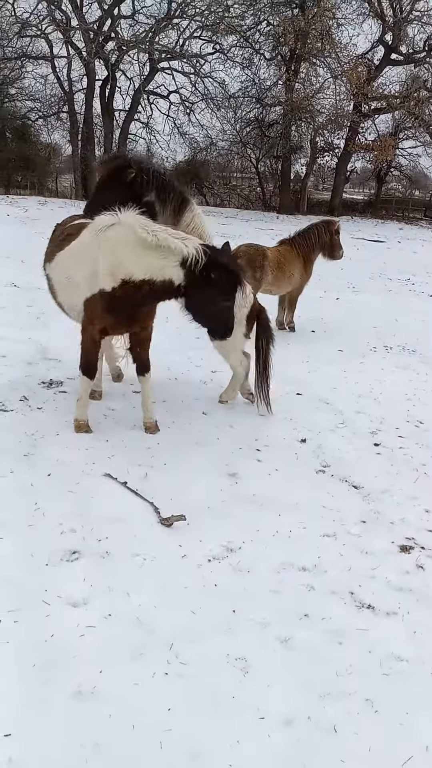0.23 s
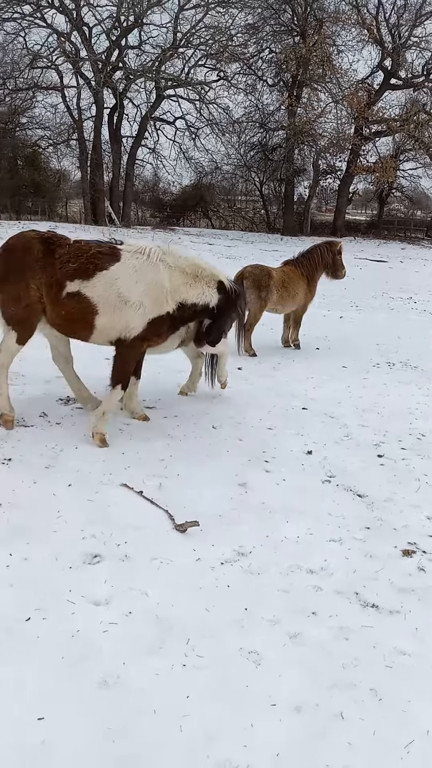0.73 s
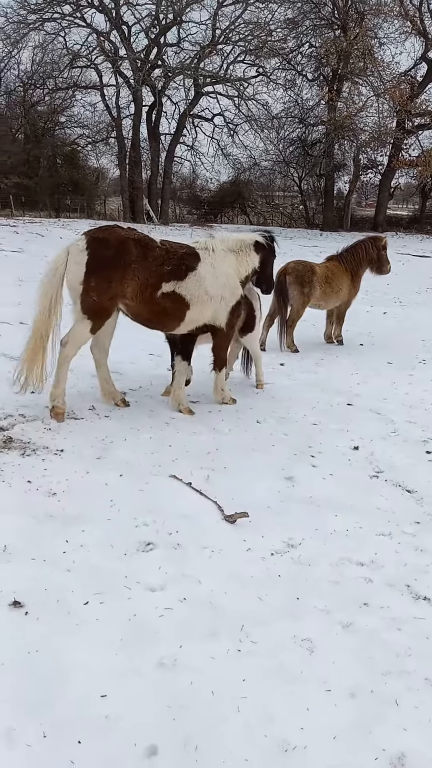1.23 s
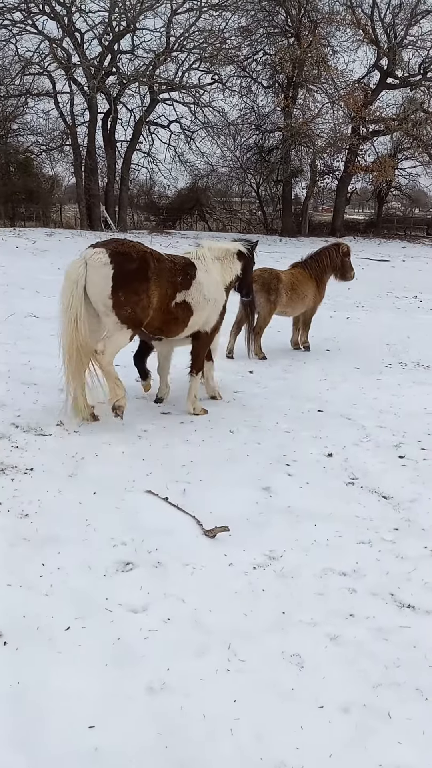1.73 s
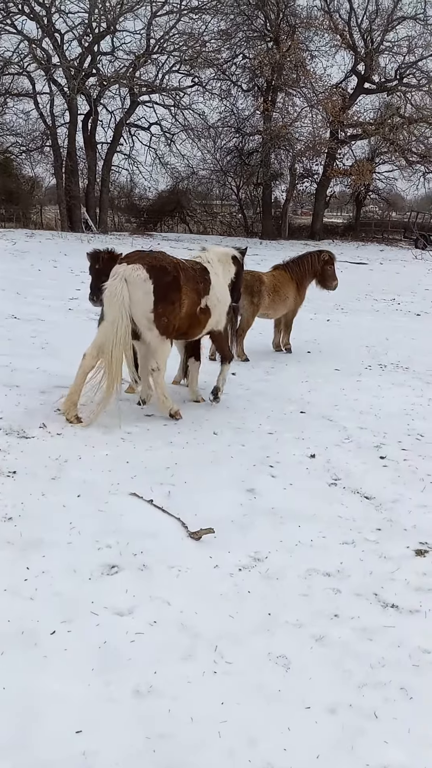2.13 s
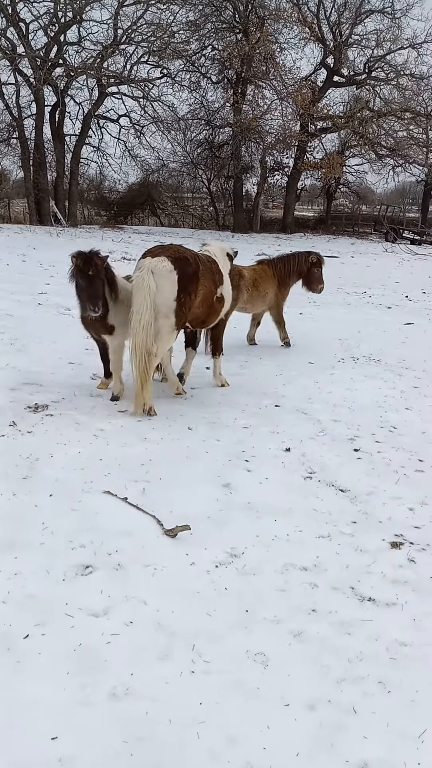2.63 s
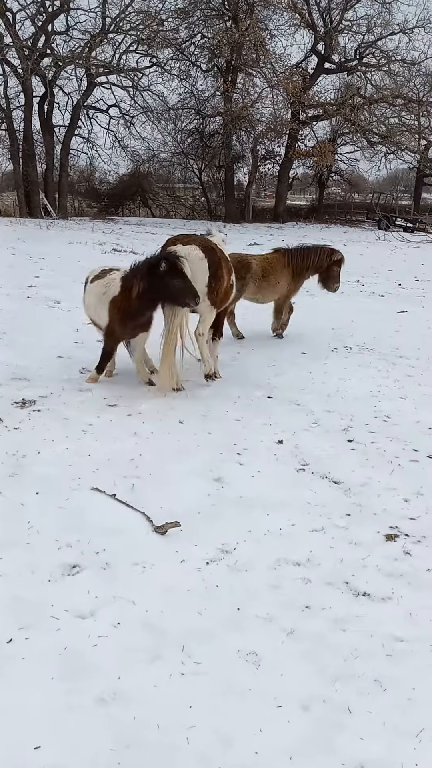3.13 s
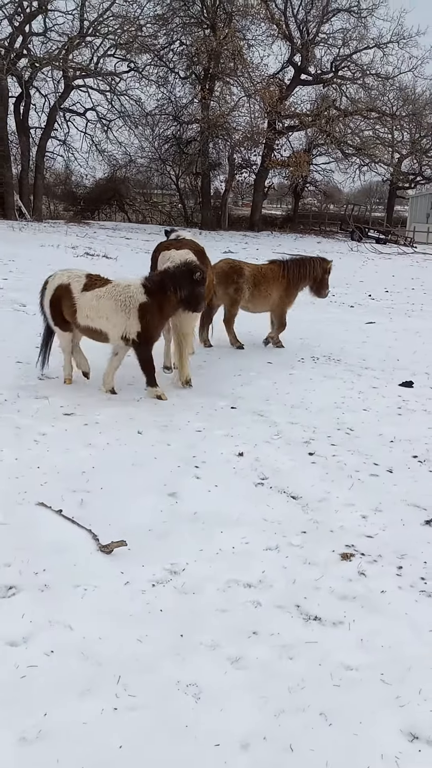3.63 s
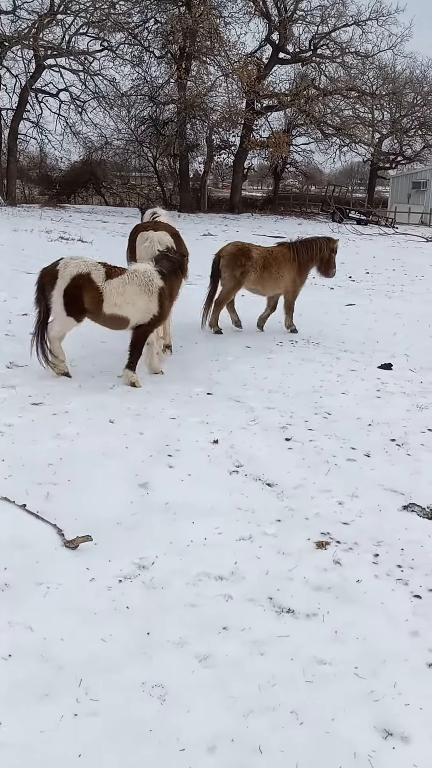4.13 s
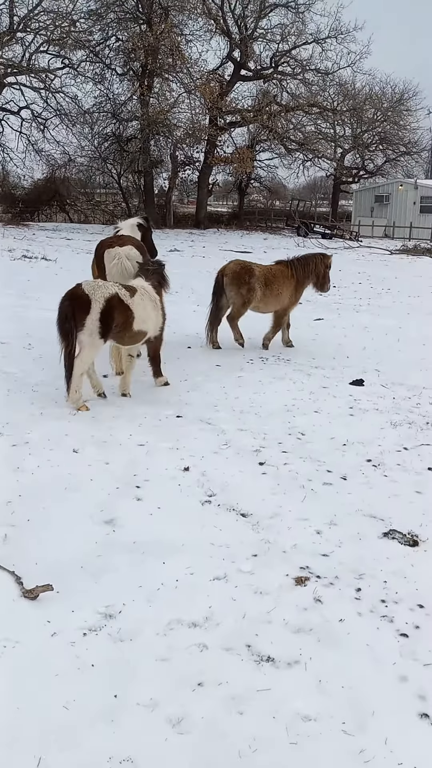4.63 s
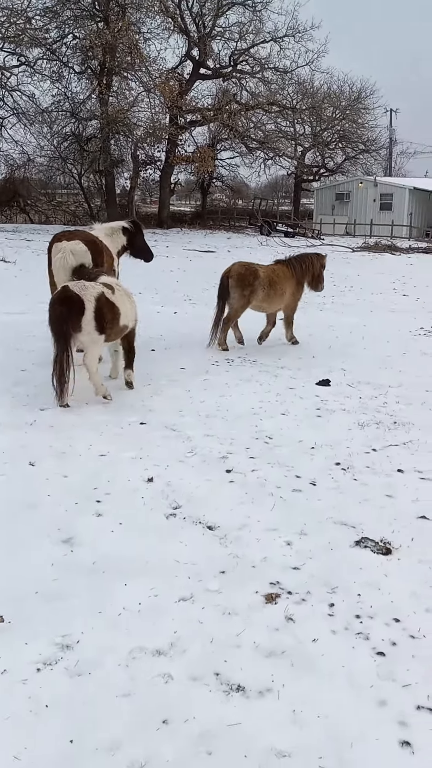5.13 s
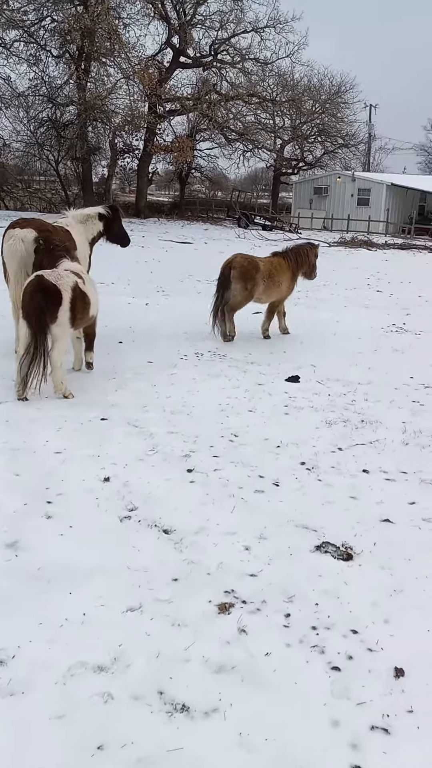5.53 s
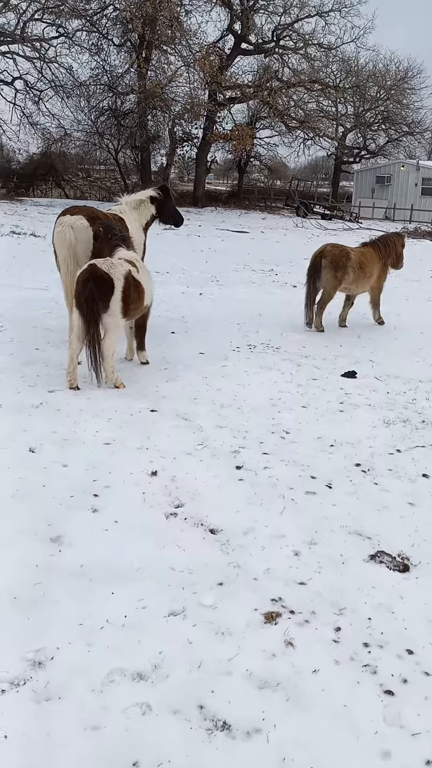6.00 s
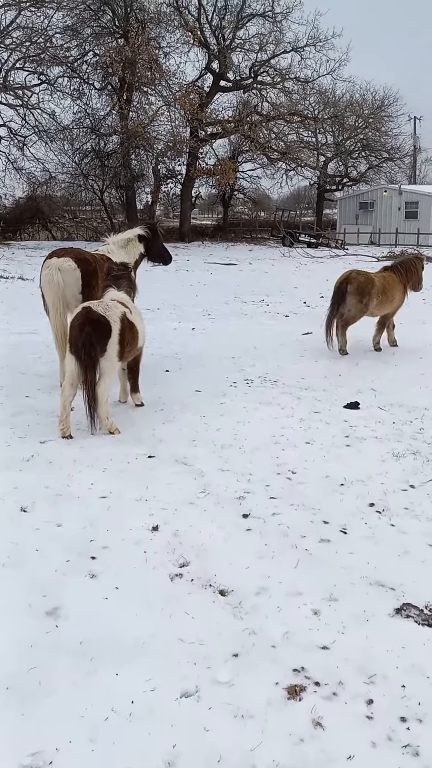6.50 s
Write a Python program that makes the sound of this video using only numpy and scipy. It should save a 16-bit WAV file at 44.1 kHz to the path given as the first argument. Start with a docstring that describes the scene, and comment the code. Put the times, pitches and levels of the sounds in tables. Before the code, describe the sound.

Hooves crunch through thin, crusted icy snow in quick irregular steps, with squeaky snaps, dull thuds and bright ice ticks over a low outdoor rumble.

```python
"""Pony hooves tread a thin crust of icy snow in an open field, a few metres from a hand-held stereo microphone.
Each step or scuff is a run of random clicks, tiny fractures, filtered into crunch, packed snow and grit.
Larger plates snap with a short squeak (a sine burst), hooves thud (low sagging tones) and ice crumbs tick
(ringing noise bursts). Loose crumbs crackle between steps and a low outdoor rumble, shaped noise, lies underneath.
Early on, one puff of wind, low resonant noise, brushes the right opening (port) of the microphone."""
import sys
import numpy as np
from scipy import signal
from scipy.fft import rfft, irfft, next_fast_len
from scipy.io import wavfile
from scipy.ndimage import uniform_filter1d

SR = 44100
rng = np.random.default_rng(int(sys.argv[2]) if len(sys.argv) > 2 else 0)


def dump(signal):
    """Clip the signal to [-1, 1] and save it as 16-bit WAV at the path in sys.argv[1]."""
    limited = np.clip(np.atleast_2d(signal).T, -1, 1)
    pcm = np.round(limited * 32767).astype(np.int16)
    wavfile.write(sys.argv[1], SR, pcm)


N = 298116
TIME = np.arange(N) / SR   # seconds


def from_db(db):
    """Turn decibels into gain."""
    return 10 ** (np.asarray(db) / 20)


def rms_one(x):
    """Scale to an rms (average strength) of 1."""
    return x / np.sqrt(np.mean(x ** 2) + 1e-20)


def even(x, span_s):
    """Hold the strength at 1 over every short span of time."""
    power = np.abs(uniform_filter1d(np.mean(x ** 2, axis=0), max(int(span_s * SR), 2)))
    return x / np.sqrt(power + 1e-9)


def drift(per_s):
    """Wander at random with rms 1, in straight lines between per_s new values a second."""
    return rms_one(np.interp(TIME * per_s, np.arange(N), rng.standard_normal(N)))


def in_time(curve, s):
    """Read the columns of a curve at time s."""
    times, *columns = np.transpose(curve)
    return [np.interp(s, times, column) for column in columns]


def at_hz(points, hz):
    """Read a spectrum on a log-frequency axis."""
    f, value = np.transpose(points)
    return np.interp(np.log(hz), np.log(f), value)


def colour(x, spectrum, size=4096):
    """Filter without pre-echo to the shape of a spectrum; white noise keeps its rms."""
    hz = np.maximum(np.arange(size // 2 + 1) * SR / size, 1)
    # folding the cepstrum makes the filter respond as early as it can (minimum phase)
    cepstrum = irfft(np.log(from_db(at_hz(spectrum, hz))))
    cepstrum[1:size // 2] *= 2
    cepstrum[size // 2 + 1:] = 0
    response = irfft(np.exp(rfft(cepstrum)))
    return signal.oaconvolve(x, response[None] / np.linalg.norm(response), axes=1)[:, :N]


def resonate(x, hz, width_hz):
    """Ring at one resonance; white noise keeps its rms."""
    r = np.exp(-np.pi * width_hz / SR)
    gain = np.sqrt((1 - r * r) / 2)
    return signal.lfilter(gain * np.array([1, 0, -1]), [1, -2 * r * np.cos(2 * np.pi * hz / SR), r * r], x)


def both_ports(x, lead_s):
    """Let a sound reach the left port lead_s before the right one."""
    return np.array([x, np.interp(TIME - lead_s, TIME, x)])


def swell(s, length_s, tail=1):
    """Give sample indices, time from the peak and envelope of a burst that builds up and dies."""
    first = max(int((s - 4 * length_s) * SR), 0)
    last = min(int((s + 5 * length_s * tail) * SR), N)
    at = np.arange(first, last)
    t = TIME[at] - s
    return at, t, 1 / np.cosh(2 * t / (length_s * np.where(t > 0, tail, 1)))


LEAD_SPREAD_S = .000017   # largest time lead of a spot under the hoof


def fractures(per_s, spread_db, clump_db, even_s, count=5):
    """Break ice bonds at random, mostly small and in clumps of loudness, at several spots: stereo clicks."""
    out, together = 0, drift(170)
    for offset in np.linspace(-1, 1, count):
        born = rng.random(N) < per_s / count / SR
        size_db = spread_db * np.minimum(rng.exponential(1, N), 4) + clump_db * together
        sizes = from_db(size_db) * rng.choice([-1, 1], N)
        out = out + both_ports(born * sizes, round(offset * LEAD_SPREAD_S * SR) / SR)
    return even(out, even_s)


def flake(clicks, ring, decay_s, size=512):
    """Make each click ring briefly with a random pattern of resonances, drawn afresh for each run."""
    response = rng.standard_normal(size) * np.exp(-TIME[:size] / decay_s)
    response *= ring / np.linalg.norm(response)
    response[0] = 1
    rung = signal.fftconvolve(clicks, response[None] / np.linalg.norm(response), axes=1)
    return rung[:, :clicks.shape[1]]


# A hoof sinks in (fading) or rolls off (swelling).
# Each row: start in seconds, length in seconds, base level in dB, change over the run in dB.
STEPS = [(0.0, 0.028, -34, 1), (0.105, 0.088, -31, 4), (0.173, 0.15, -23.5, -3), (0.346, .1, -30.5, -13),
         (0.536, 0.16, -23.5, -5.5), (0.692, 0.13, -36, 13), (1.09, 0.16, -33, -10.5),
         (1.335, 0.03, -38.5, -5), (1.38, 0.058, -36, -7), (1.543, 0.08, -44, 20), (2.042, .13, -25, 1),
         (2.19, 0.09, -35, -7), (2.383, 0.13, -31, -15.5), (2.492, 0.15, -42, -0.5),
         (2.682, 0.054, -34, 24), (2.777, 0.032, -29, -6), (2.861, 0.076, -30, -4), (3.032, .15, -29, 2),
         (3.194, 0.16, -25, -5.5), (3.373, .18, -31, 4), (3.568, .18, -35.5, -6.5), (3.755, 0.091, -29, -9),
         (3.841, 0.057, -30.5, 31), (3.898, .14, -34, 11), (4.042, 0.14, -32.5, 17),
         (4.195, 0.12, -33, -2.5), (4.335, 0.14, -31.5, -8), (4.519, 0.048, -32, 11), (4.6, 0.15, -28, -7),
         (4.741, 0.21, -30.5, -20.5), (4.975, 0.055, -24.5, -11), (5.078, 0.032, -23.5, -14),
         (5.105, 0.077, -43.5, 0), (5.237, 0.075, -34.5, 2), (5.306, .16, -39, -1), (5.484, .24, -33.5, -8),
         (5.741, 0.082, -30.5, 6), (5.86, 0.075, -53, 12), (5.939, 0.094, -27.5, -4.5),
         (6.055, .17, -42, 5), (6.247, 0.068, -32, -12), (6.311, 0.17, -41.5, 2), (6.472, 0.15, -34.5, 2),
         (6.691, 0.059, -36, 18)]
# A hoof only scuffs the crust. Each row: start in seconds, base level in dB.
SCUFFS = [(0.059, -29), (0.822, -30), (1.207, -37), (1.295, -40.5), (1.449, -31), (1.507, -35),
          (1.636, -35.5), (1.693, -47), (1.753, -35), (1.845, -34), (1.978, -31), (2.736, -30.5),
          (2.899, -31.5), (3.004, -34), (3.09, -32.5), (3.626, -27), (4.926, -40), (5.041, -30),
          (5.194, -41), (6.639, -35)]
# The patch of snow being trodden.
# Each row: time in seconds, base crust pitch in Hz, extra grit in dB, extra weight in dB.
PATCH = [(0, 2020, 2.5, -0.5), (.7, 1990, -0.5, -3.5), (1.2, 1770, -4.5, -1.5), (1.8, 1920, 0, 2),
         (2.2, 2060, -2, -2.5), (3.1, 1680, 0.5, 0.5), (3.5, 1620, -5, -1.5), (3.8, 1830, -1, 2.5),
         (4.3, 1840, 1, 1.5), (5.2, 1740, 1.5, 0.5), (5.9, 1550, -3, -0.5), (6.76, 1570, -1.5, 4)]
SCUFF_S, SCUFF_FADE_DB = 0.053, -34.5   # every scuff dies away alike
# a harder crush shakes more packed snow (weight) and throws more grit: base levels for a typical crush
TYPICAL_DB = -30
STEP_WEIGHT_DB, STEP_GRIT_DB, SCUFF_WEIGHT_DB, SCUFF_GRIT_DB = -28.5, -36.5, -24, -35.5
WEIGHT_FOLLOWS, GRIT_FOLLOWS = 0.8, 0.54   # dB per dB of crush


def runs():
    """List each step and scuff with weight and grit set by its strength and the snow underfoot."""
    steps = [(*row, STEP_WEIGHT_DB, STEP_GRIT_DB) for row in STEPS]
    scuffs = [(s, SCUFF_S, level_db, SCUFF_FADE_DB, SCUFF_WEIGHT_DB, SCUFF_GRIT_DB) for s, level_db in SCUFFS]
    for s, length, level_db, change_db, weight_db, grit_db in steps + scuffs:
        hz, gritty_db, heavy_db = in_time(PATCH, s)
        force_db = level_db - TYPICAL_DB
        weight_db = weight_db + heavy_db + WEIGHT_FOLLOWS * force_db
        grit_db = grit_db + gritty_db + GRIT_FOLLOWS * force_db
        yield s, length, level_db, change_db, hz, weight_db, grit_db


# How the sound of crust, packed snow and grit spreads over pitch.
# Each row of all three: frequency in Hz, relative strength in dB per Hz.
CRUST = [(150, -16), (330, 0.5), (480, -2.5), (660, 3), (1000, -4), (1400, -1), (2100, -1), (2450, -3),
         (2750, -5), (3300, -15), (4500, -29), (9000, -71)]
WEIGHT = [(25, -48), (50, -27.5), (75, -0.5), (115, 4.5), (180, -3), (280, -5), (400, -14.5), (900, -42.5)]
GRIT = [(1500, -63), (2650, 3), (3200, 3), (4200, 4), (5400, -3.5), (6500, -0.5), (7000, 4), (7750, 8),
        (8600, -4), (9500, -11.5), (10300, -5.5), (12500, -0.6), (15000, 1), (16000, -21)]


def crunches(settle_s=0.0054):
    """Let runs of fractures ring the crust, shake the packed snow below and throw off grit."""
    coarse = colour(fractures(per_s=1500, spread_db=3.5, clump_db=3.0, even_s=0.037), CRUST)
    fine = colour(fractures(per_s=4000, spread_db=4.0, clump_db=5.0, even_s=0.023), GRIT)
    # plates of three sizes ring, each coming and going on its own
    turns = [rms_one(from_db(7.15 * drift(70))) for _ in range(3)]
    out, weight = np.zeros((2, N)), np.zeros(N)
    for s, length, level_db, change_db, hz, weight_db, grit_db in runs():
        at = np.arange(max(int((s - .004) * SR), 0), min(int((s + length + .06) * SR), N))
        t = TIME[at] - s
        fade_in = np.clip(.5 + t / 0.0067, 0, 1)
        settling = np.exp(-np.maximum(t - length, 0) / settle_s)   # the crumbs settle after the run
        gate = fade_in * settling
        shape = rms_one(from_db(change_db * np.clip(t / length, 0, 1)) * gate)
        share = np.sqrt(length * SR / len(at))   # refers the level to the run, not to its tail
        crust = flake(coarse[:, at] * shape, ring=0.6, decay_s=0.0013)
        plates = sum(resonate(crust * turn[at], hz * step, width_hz=600)
                     for step, turn in zip((.84, 1.02, 1.14), turns))
        crust = rms_one(crust + from_db(-11.5) * plates)
        grit = rms_one(flake(fine[:, at] * shape, ring=0.8, decay_s=0.0009))
        out[:, at] += share * (from_db(level_db + 1.32) * crust + from_db(grit_db - 1.1) * grit)
        weight[at] += from_db(weight_db) * np.sqrt(share * shape * gate)
    packing = colour(fractures(per_s=1500, spread_db=3, clump_db=3.5, even_s=0.019), WEIGHT)
    return out + from_db(-3.5) * even(packing, 0.0296) * weight


def strays():
    """Keep loose crumbs crackling between the steps, louder as the snow gets trampled."""
    dull = colour(fractures(per_s=500, spread_db=3.5, clump_db=1, even_s=0.2), CRUST)
    bright = colour(fractures(per_s=500, spread_db=0.0, clump_db=5.0, even_s=0.56), GRIT)
    trampled = from_db(np.interp(TIME, [2.3, 3.5], [-4, 0]))
    return trampled * (from_db(-45.5) * dull + from_db(-47.5) * bright)


# How the rumble spreads over pitch. Each row: frequency in Hz, relative strength in dB per Hz.
RUMBLE = [(20, -41), (42, -31), (65, 0), (90, 6.4), (125, -1.5), (180, -15.5), (300, -16), (500, -31.5),
          (900, -49), (1700, -21.5), (3000, -32.5), (15000, -48)]
# How loud the rumble is. Each row: time in seconds, level in dB.
RUMBLE_LEVEL = [(.7, -32.5), (.92, -39), (1.8, -33), (2.3, -36.5), (2.6, -32), (3.9, -33), (4.45, -38),
                (4.8, -36), (6, -33.5)]


def outdoors(apart=0.29):
    """Shape noise into a low rumble with a faint hiss, partly different at each port."""
    air = rng.standard_normal(N) + apart * rng.standard_normal((2, N))
    level = from_db(in_time(RUMBLE_LEVEL, TIME)[0])
    return level * even(colour(air, RUMBLE), 0.1)


# Plates of crust breaking. Each row: peak time in seconds, base level in dB, middle pitch in Hz.
SNAPS = [(0.0284, -9, 1960), (.0651, -4, 1960), (0.1721, -5.5, 2060), (0.203, -10, 2180),
         (0.3197, -20, 1960), (0.5534, -23, 1710), (0.5929, -11, 1820), (.613, -14, 1700),
         (.673, -8.5, 675), (.8022, -8, 2070), (0.8315, -6, 1730), (1.1008, -10, 1310), (1.1557, -18, 2100),
         (1.3835, -12, 1980), (1.41, -17.5, 580), (1.4505, -11.5, 2030), (1.696, -18.5, 1780),
         (1.8679, -11.5, 850), (2.088, -4.5, 1910), (2.119, -22, 1970), (2.2594, -12.5, 2180),
         (2.3817, -14, 1900), (2.467, -15, 1630), (2.5921, -13.5, 1720), (2.7956, -12, 1760),
         (2.9002, -13, 1040), (2.9482, -11.5, 584), (3.0685, -13, 1480), (3.0919, -9, 1580),
         (3.129, -12, 1780), (3.1984, -7, 1860), (3.2226, -14, 1690), (3.4448, -14.5, 1660),
         (3.585, -6, 1870), (3.6018, -11, 1780), (3.67, -8.5, 1680), (3.7638, -17, 880),
         (3.8063, -12.5, 1860), (3.895, -14.5, 1830), (4.24, -11.5, 1590), (4.2507, -9, 1880),
         (4.2969, -14, 1500), (4.3473, -16, 1900), (4.5127, -3.5, 1370), (4.5894, -11, 1650),
         (4.6806, -8.5, 2190), (4.746, -9.5, 1660), (4.8939, -19.5, 750), (4.9952, -12, 1840),
         (5.0122, -7, 1840), (5.0502, -13, 1290), (5.0818, -16, 1900), (5.0982, -17, 1880),
         (5.208, -24.5, 516), (5.249, -19, 1920), (5.5972, -13.5, 1560), (5.6596, -9.5, 1700),
         (5.7744, -12, 1160), (5.8402, -9, 1620), (6.028, -5.5, 1640), (6.1468, -15, 1830),
         (6.2492, -8, 1680), (6.3006, -8.5, 1760), (6.5784, -12.5, 1500), (6.6406, -13, 1540),
         (6.7514, -9, 1600)]
# Where the snaps lie on average. Each row: time in seconds, left minus right level in dB.
SNAP_SIDE = [(0, -6.5), (.5, -8), (.7, -1.5), (3, -3), (6.76, -1.5)]
SNAP_S, SNAP_SCATTER = .00125, .22   # typical length in seconds, and its spread from plate to plate (log units)
SNAP_GRIT_DB, SNAP_GRIT_FOLLOWS = -20, 0.42   # base grit of a 0 dB snap, and dB per dB of snap
SNAP_LEAD_S = .00009   # average time lead of the left port
SNAP_SPREAD_DB, SNAP_LEAD_SPREAD_S = 3, .00009   # each plate lies in a slightly different direction


def snaps(rough=0.4, wander=0.092):
    """Break each plate with a quick stick-slip squeak, a broad crack and a puff of grit."""
    squeak, crack, grit = np.zeros((3, 2, N))
    breaking = even(colour(rng.standard_normal((1, N)), CRUST), 0.0018)[0]
    jitter = rng.standard_normal(N)
    for s, level_db, hz in SNAPS:
        at, t, envelope = swell(s, SNAP_S * np.exp(SNAP_SCATTER * rng.standard_normal()))
        pan_db = in_time(SNAP_SIDE, s)[0] + SNAP_SPREAD_DB * rng.standard_normal()
        lead_s = SNAP_LEAD_S + SNAP_LEAD_SPREAD_S * rng.standard_normal()
        phase = 2 * np.pi * (hz * t + rng.random()) + wander * np.cumsum(jitter[at])
        slips = np.sqrt(2) * np.sin(phase)
        sides = rms_one(from_db([pan_db, 0])) * from_db(level_db)
        for side, early in enumerate((lead_s / 2, -lead_s / 2)):
            squeak[side, at] += sides[side] * np.interp(t + early, t, envelope * slips)
            crack[side, at] += sides[side] * np.interp(t + early, t, envelope * breaking[at])
        grit[:, at] += from_db(SNAP_GRIT_DB + SNAP_GRIT_FOLLOWS * level_db) * envelope
    # the squeak keeps little above about 2.4 kHz
    squeak = signal.sosfilt(signal.butter(6, 2450, fs=SR, output="sos"), squeak)
    puffs = colour(grit * rng.standard_normal((2, N)), GRIT)
    return from_db(-3) * (squeak + rough * crack) + from_db(-7.0) * puffs


# A puff of wind on the right port. Each row: time in seconds, level in dB.
GUST = [(.05, -49), (.13, -27), (.3, -28), (.34, -10), (.4, -20.5), (.48, -21.5), (.57, -29), (.63, -48),
        (.7, -100)]


def gust(hz=92, width_hz=45):
    """Buffet the right port only with eddies: noise through two low resonances."""
    eddies = resonate(rng.standard_normal((1, N)), hz, width_hz)
    eddies = resonate(eddies, hz, 3 * width_hz)
    right_only = np.array([[0], [1]])
    return from_db(in_time(GUST, TIME)[0]) * even(eddies, 0.048) * right_only


# The hoof meeting the ground. Each row: peak time in seconds, base level in dB, pitch at the peak in Hz.
THUDS = [(0.169, -18, 162), (.214, -13.5, 173), (.68, -6.5, 144), (.84, -21, 136), (1.112, -18.5, 123),
         (1.419, -14.5, 147), (1.871, -16, 112), (2.052, -15, 153), (2.171, -23, 136), (2.746, -12.5, 167),
         (2.907, -22, 174), (2.949, -12.5, 280), (3.042, -13.5, 200), (3.132, -14.5, 229),
         (3.175, -15, 171), (3.21, -11.5, 199), (3.634, -11.5, 190), (3.681, -18, 125), (3.813, -19.5, 119),
         (3.911, -16.5, 109), (4.027, -12, 252), (4.162, -19.5, 152), (4.621, -19, 174), (4.751, -13, 233),
         (4.821, -20, 170), (5.002, -17.5, 150), (5.215, -16.5, 208), (6.58, -14.5, 173)]
THUD_CYCLES = 1.1   # base length in cycles, so deeper thuds last longer


def thuds(knock=0.44):
    """Land the hoof on frozen ground: a cycle or two of low push with a dull knock in it."""
    out = np.zeros(N)
    ground = rms_one(colour(rng.standard_normal((1, N)), WEIGHT))[0]
    for s, level_db, hz in THUDS:
        length = THUD_CYCLES / hz
        at, t, envelope = swell(s, length * 0.91, tail=0.93)
        sag = 1.4 * np.log(np.cosh(t / length))   # the pitch sags as the snow yields
        push = np.sin(2 * np.pi * (hz * t + rng.random()) - sag)
        out[at] += from_db(level_db) * envelope * (push + knock * ground[at])
    return from_db(-0.4) * out


# Ice crumbs splitting. Each row: peak time in seconds, base level in dB, pitch in Hz.
TICKS = [(1.088, -37, 13100), (1.384, -28, 4200), (1.616, -27, 12400), (1.694, -24.5, 4500),
         (1.8157, -29, 4180), (2.217, -24.5, 4540), (2.7784, -30, 4200), (3.0388, -21, 7340),
         (3.201, -24.5, 7040), (3.3086, -20.5, 7300), (3.379, -29, 12600), (3.635, -25, 7200),
         (3.6715, -21.5, 7360), (3.8686, -22, 7600), (4.119, -20.5, 4140), (4.152, -19, 4170),
         (4.3943, -23.5, 7500), (4.42, -24.5, 8000), (4.6067, -13, 5900), (4.683, -17.5, 12300),
         (4.9308, -24, 6800), (5.004, -24, 4200), (5.4956, -23.5, 6800), (5.646, -18, 5500),
         (6.5477, -20.5, 5400)]


def ticks(ring=1.0):
    """Split crumbs of ice with a bright tick of noise and a trace of pitch."""
    spray, tone = np.zeros((2, 2, N))
    chips = rng.standard_normal((2, N))
    for s, level_db, hz in TICKS:
        at, t, envelope = swell(s, .0015, tail=3.45)   # rises fast, dies more slowly
        burst = from_db(level_db) * envelope * chips[:, at]
        spray[:, at] += burst
        tone[:, at] += resonate(burst, hz, width_hz=2200)
    return from_db(-8) * (colour(spray, GRIT) + ring * tone)


def scatter(x, t60=0.062, size=4096):
    """Throw back a very short, diffuse tail from ground and clothing; t60 is its 60 dB decay in seconds."""
    tail = rng.standard_normal((2, size)) * from_db(-60 * TIME[:size] / t60)
    tail *= TIME[:size] > .002   # the first echo takes 2 ms
    return signal.oaconvolve(x, tail / np.linalg.norm(tail, axis=1, keepdims=True), axes=1)[:, :N]


# The two microphone ports in their housing.
# Each row: frequency in Hz, left minus right level in dB, phase lead of the left in radians.
PORTS = [(101, -0.5, 0.08), (332, -3, 0.25), (500, 1, 0.4), (835, 1.5, 0.35), (1150, 0.5, 0.25),
         (1930, -5, 0.9), (2590, -2.5, 3.5), (4420, 2, 4.5), (8640, -1, 10.5), (15700, -2, 17)]
SIZE = next_fast_len(N + 8192, real=True)   # transform length in samples, with room for tails
FREQS = np.maximum(np.arange(SIZE // 2 + 1) * SR / SIZE, 1)


def scene():
    """Mix steps and background, shaded and delayed differently at the two ports, with snaps and wind."""
    steps = crunches() + ticks() + strays()
    cracks = snaps()
    near = steps + thuds() + outdoors() + from_db(-11.5) * scatter(steps)
    hz, balance_db, lead = np.transpose(PORTS)
    # each port takes half of the difference
    shade = from_db(at_hz(np.c_[hz, balance_db], FREQS) / 2)
    ratio = shade * np.exp(.5j * at_hz(np.c_[hz, lead], FREQS))
    heard = irfft(rfft(near, SIZE) * [ratio, 1 / ratio], SIZE)[:, :N]
    return heard + cracks + from_db(-11.5) * scatter(cracks) + gust()


CUTOFF_HZ = 16100


def record(dry):
    """Cut the deep bass, stop peaks at full scale, then cut the top."""
    thin = signal.sosfilt(signal.butter(3, 48, "high", fs=SR, output="sos"), dry)
    clipped = np.clip(thin, -1, 1)
    return signal.sosfilt(signal.ellip(10, .1, 80, CUTOFF_HZ, fs=SR, output="sos"), clipped)


dry = scene()
out = record(dry)
dump(out)
```